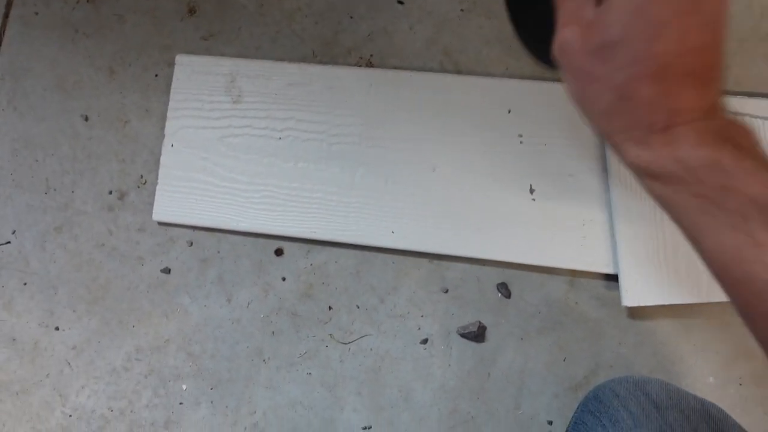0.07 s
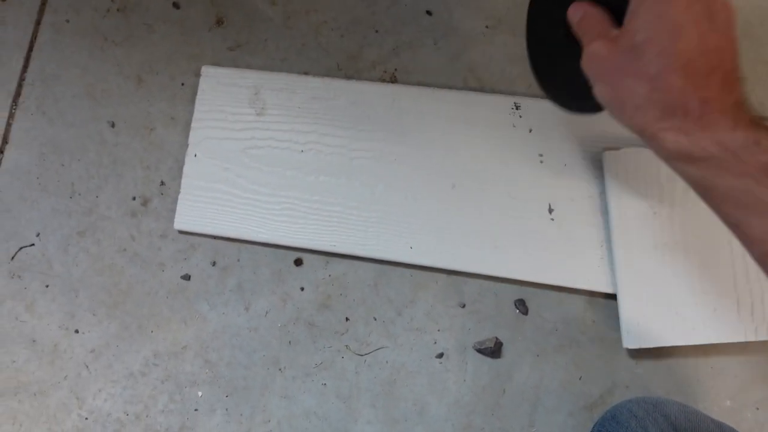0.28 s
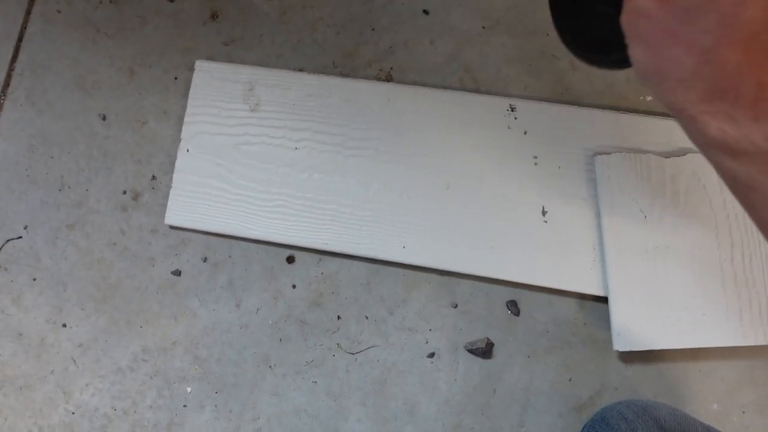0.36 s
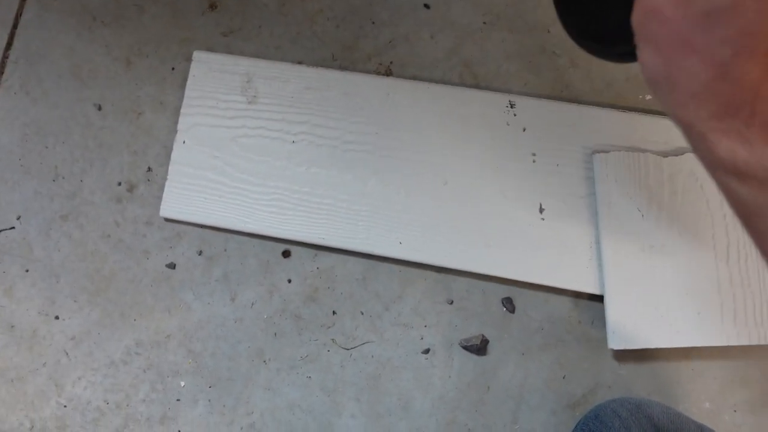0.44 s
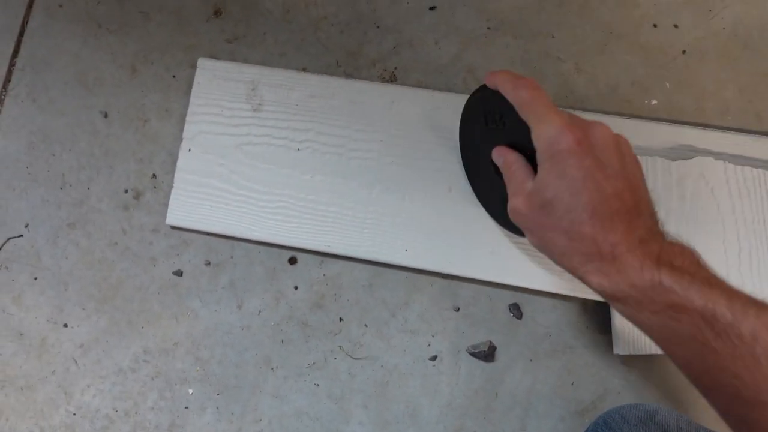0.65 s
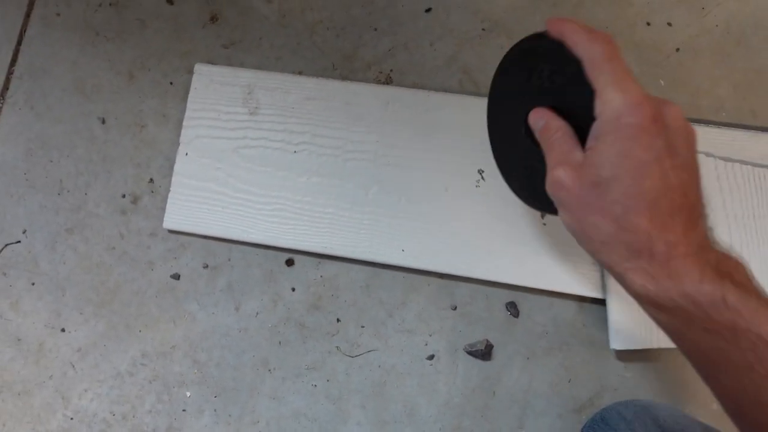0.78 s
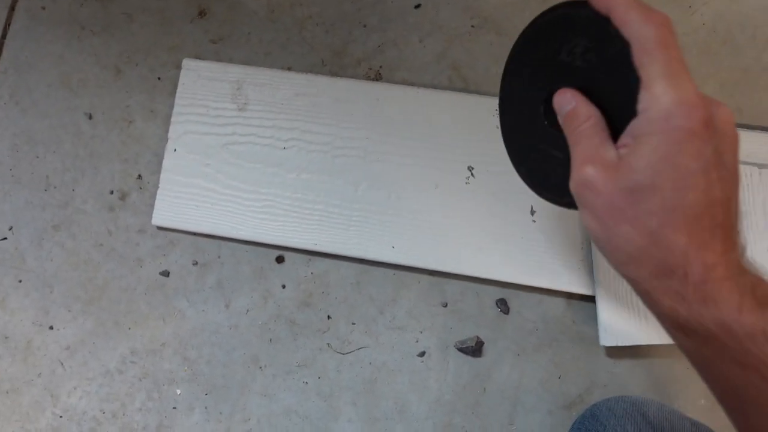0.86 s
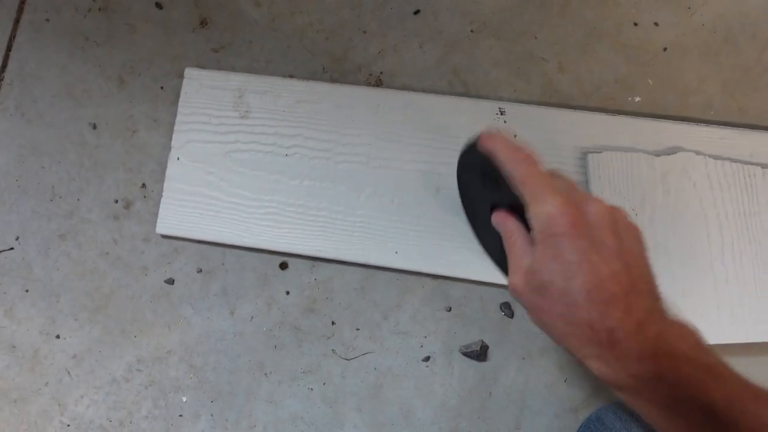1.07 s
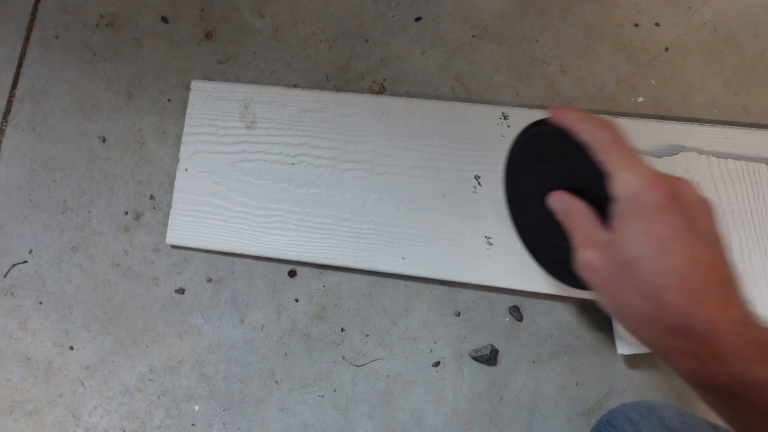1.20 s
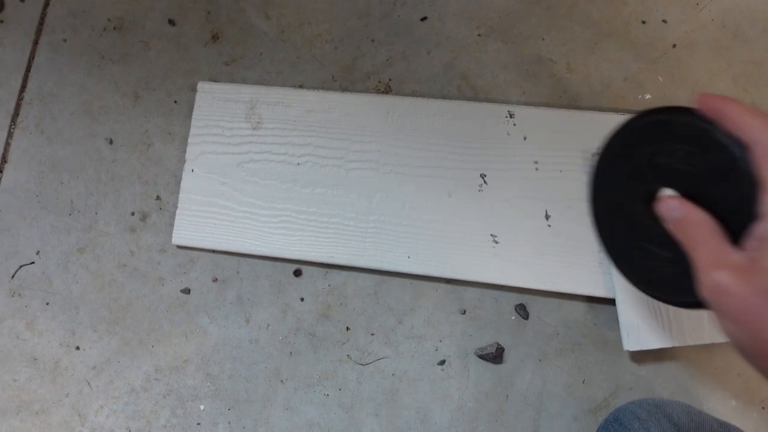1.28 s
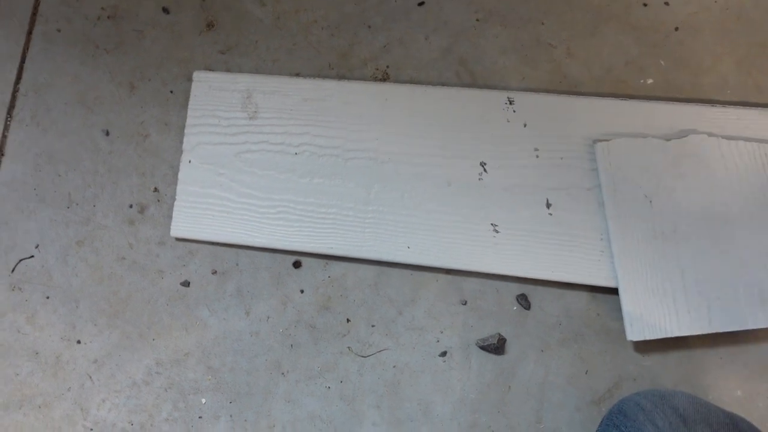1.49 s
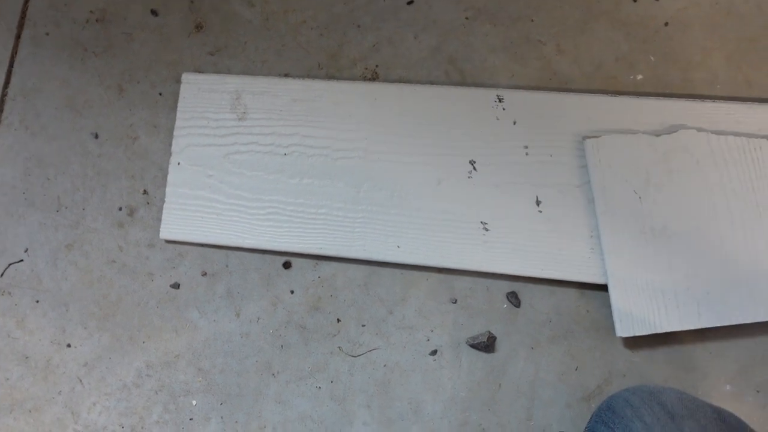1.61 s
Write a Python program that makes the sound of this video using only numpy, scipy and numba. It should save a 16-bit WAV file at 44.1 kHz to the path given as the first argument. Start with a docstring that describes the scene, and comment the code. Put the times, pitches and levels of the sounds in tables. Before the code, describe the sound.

Hard knocks of a small iron plate on a loose cement board. A faint dull sound dies away over hiss, then blows land at about 0.2, 0.7 and 1.17 seconds. Each cracks and thuds with a short, woody-stony ring, then the board chatters and slaps on concrete for 0.2 to 0.35 seconds. Bare garage walls ring briefly. The close microphone overloads; the left is much louder.

```python
"""Over hiss and a very low wobble, a dull sound dies away; then a small iron weight plate knocks three times
on a cement board lying loose on a garage floor. Each blow rings the board's damped modes, cracks and thuds;
the board then chatters and slaps on the concrete, and bare walls ring on as decaying banded noise.
The close microphone overloads on the blows and its gain control ducks late, so the left channel clips."""
import sys
import numpy as np
from scipy import signal
from scipy.fft import rfft, irfft
from scipy.io import wavfile
from numba import njit

SR = 44100
rng = np.random.default_rng(int(sys.argv[2]) if len(sys.argv) > 2 else 0)


def inscribe(sig):
    """Save sig as 16-bit PCM at rate SR to the path in sys.argv[1].

    A 1-D sig is mono; a 2-D sig holds one channel per row.
    Samples are clipped to [-1, 1] before scaling.
    """
    pcm = np.round(np.clip(np.atleast_2d(sig).T, -1, 1) * 32767)
    wavfile.write(sys.argv[1], SR, pcm.astype(np.int16))


N = 72765

PREAMP_DB = 7.5
RIGHT_DB, UNLIKE_DB = -10.5, -36  # right against left; unshared echoes against the left signal


def undb(db):
    """Decibels to amplitude factor."""
    return 10 ** (np.asarray(db, float) / 20)


def unit(x):
    """Scale to rms 1."""
    return x / np.sqrt(np.mean(x ** 2))


def band(x, lo_hz, hi_hz):
    """Band-pass, its upper edge held below the Nyquist frequency."""
    sos = signal.butter(2, [lo_hz, min(hi_hz, .45 * SR)], "band", fs=SR, output="sos")
    return signal.sosfilt(sos, x)


def taps(times, sizes):
    """Impulses at the given times."""
    x = np.zeros(N)
    index = np.clip((np.asarray(times) * SR).astype(int), 0, N - 1)
    np.add.at(x, index, sizes)
    return x


def decay_per_sample(t60):
    """Factor per sample for a fall of 60 dB in t60 seconds."""
    return np.exp(-np.log(1000) / (t60 * SR))


def mode(x, hz, t60):
    """One damped resonance: a complex pole struck by each impulse."""
    pole = np.exp(2j * np.pi * hz / SR) * decay_per_sample(t60)
    return signal.lfilter([1], [1, -pole], x).imag


# Dull sound at the start, by band; level as it begins, at the preamp output
# columns: [f/Hz, level/dB, t60/s]
FADING = [(130, -63.5, 0.97), (256, -60, 1), (582, -51.5, 0.46), (1090, -55, 0.35), (1440, -62, 0.5),
          (2600, -61.5, .3)]


def dull_sound():
    """Bands of noise, each dying away exponentially from the first instant."""
    t = np.arange(N) / SR
    dying = np.zeros(N)
    for hz, db, t60 in FADING:
        noise = unit(band(rng.standard_normal(N), hz / 1.21, hz * 1.22))
        dying += undb(db - PREAMP_DB - 60 * t / t60) * noise
    return dying


# Spectrum shape of the microphone channel's own noise
# columns: [f/Hz, relative level/dB]
HISS = [(35, 20.5), (150, -12), (500, -18), (2000, -7), (6000, -10), (12000, -10), (16000, -14)]
HISS_DB = [[-63], [-69]]  # left, right


def hiss():
    """Own noise of each channel, shaped in the spectrum."""
    hz = np.arange(N // 2 + 1) * SR / N + 1
    corner_hz, corner_db = np.array(HISS).T
    shape = undb(np.interp(np.log(hz), np.log(corner_hz), corner_db))
    noise = irfft(rfft(rng.standard_normal((2, N))) * shape, N)
    return undb(HISS_DB) * unit(noise)


# Course of the very low wobble from the hand on the recorder
# columns: [t/s, level/dB before the channel gains]
RUMBLE = [(0.0, -56), (0.09, -41.5), (0.142, -52.5), (0.242, -38.5), (0.284, -44), (0.352, -28.5),
          (0.418, -49.5), (0.886, -41.5), (0.914, -54), (1.034, -38.5), (1.35, -65), (1.524, -33.5),
          (1.59, -41), (1.65, -56.5)]
RUMBLE_HZ = 14.5


def rumble():
    """A slow sine below hearing pitch, its level following the hand on the recorder."""
    t = np.arange(N) / SR
    wave = np.sqrt(2) * np.sin(2 * np.pi * RUMBLE_HZ * t)
    level_db = np.interp(t, *np.array(RUMBLE).T)
    return wave * undb(level_db) * undb([[3.6], [3.0 + RIGHT_DB]])


# The three knocks of plate on board; crack and thud are relative to the level
# columns: [t/s, level/dB, crack/dB, thud/dB]
BLOWS = [(0.2102, 27.5, -6, 5), (0.7004, 23.5, 2.5, 3.5), (1.1663, 23, 3.5, -1)]


def blows():
    """Plate on board, as rows (time, ring, crack, treble); the treble lies 2.5 dB under the crack."""
    return [(s, undb(db), undb(db + crack_db), undb(db + crack_db - 2.5)) for s, db, crack_db, _ in BLOWS]


# Low resonances of the thud
# column: [f/Hz]
THUD_HZ = (45, 80, 125, 220, 350, 520)
THUD_T60_S, THUD_DB = 0.041, -19  # decay at 80 Hz; gain of all thuds


def thud():
    """Each blow strikes low damped modes; the higher ones die sooner."""
    t, level_db, _, thud_db = np.array(BLOWS).T
    strikes = taps(t, undb(level_db + thud_db + THUD_DB))
    return sum(mode(strikes, hz, THUD_T60_S * np.sqrt(80 / hz)) for hz in THUD_HZ)


# Loose chatter on the floor, one list after each blow; crack is relative to the level
# columns: [t/s, level/dB, crack/dB]
CHATTER = [
    [(.21, -13, 3), (.25, -19.5, -33), (.3, -13.5, -6.5), (.35, -18.5, -0.5), (.4, -14, -25),
     (.45, -13.5, -14), (.5, -16, -17.5), (.525, -35.5, -18), (.56, -45, -13)],
    [(.70, -13, -1), (.74, -18, -14), (.78, -14, -3), (.82, -9, -30), (.86, -17, -2.5), (.9, -31, 2),
     (.95, -47.5, -18)],
    [(1.167, 0.5, -3), (1.2, -11, -12), (1.25, -13, -5.5), (1.3, -13, -8.5), (1.35, -12.5, -13.5),
     (1.385, -20.5, -6.5), (1.41, -31, -3.5), (1.45, -72, -19)],
]
CHATTER_PER_S, CHATTER_SPREAD_DB, CHATTER_CRACK_DB = 1100, 0.5, 1


def chatter():
    """Many small random contacts of the loose board, as rows (time, ring, crack, treble)."""
    t = np.sort(rng.random(int(CHATTER_PER_S * N / SR))) * N / SR
    ring = np.zeros(len(t))
    for course in CHATTER:
        times, level_db, _ = np.array(course).T
        ring += undb(np.interp(t, times, level_db, left=-200, right=-200))  # silent outside its list
    ring = ring * undb(CHATTER_SPREAD_DB * (rng.exponential(size=len(t)) - 3.5))
    times, _, crack_db = np.vstack(CHATTER).T
    crack = ring * undb(CHATTER_CRACK_DB + np.interp(t, times, crack_db))
    return np.array([t, ring, crack, crack * undb(-30)]).T


# Board slapping the concrete; treble is relative to the crack, ring stands alone; offsets follow in slaps()
# columns: [t/s, crack level/dB, treble/dB, ring level/dB]
SLAPS = [(0.2224, 14.5, -37, 9.5), (0.232, -4.5, -5, -18), (0.2532, 4.5, -14, 1), (0.2945, -11.5, -32, -1),
         (0.3124, -18, -39, -17), (0.3278, -13, -14, -16), (0.3666, 0.5, -22, -1.5), (0.3823, 6.5, -20, 3),
         (0.4321, -11, -42, -13), (0.4363, -27, -19, -8.5), (0.451, -14, -31, -1), (0.4555, -9, -37, -2.5),
         (0.714, 13, -8.5, 8.5), (0.7295, -12, -28, -10), (0.758, -2, -36, -5), (0.7794, -2.5, -36, -2),
         (0.8044, -9, -49.5, -28), (0.8111, -1, -40, 3), (0.8653, -22.5, -15, -8.5), (1.1914, 0, -16, -7),
         (1.2167, 0.5, -26, -5), (1.2255, 1, -32, 4), (1.2675, -12, -44, -13), (1.287, -6, -22, -4.5),
         (1.2967, -3, -49, 5), (1.3068, -5, -50, 3.5), (1.3194, -12, -31, 1)]


def slaps():
    """Single slaps of board on floor, as rows (time, ring, crack, treble)."""
    return [(s, undb(ring_db), undb(db + 12), undb(db + treble_db + 16)) for s, db, treble_db, ring_db in SLAPS]


RISE_S = 0.0015  # time constant of the onset, as a 60 dB approach


def fade(x, t60):
    """Each impulse becomes an envelope with a quick rise and an exponential fall."""
    falling = signal.lfilter([1], [1, -decay_per_sample(t60)], x)
    k = decay_per_sample(RISE_S)
    return signal.lfilter([1 - k], [1, -k], falling)


# Modes of the cement board
# columns: [f/Hz, relative level/dB, t60/s]
BOARD = [(610, -9, 0.027), (815.2, -1, 0.052), (899, -8, 0.024), (953.3, 2, 0.055), (1027.8, 2.5, 0.067),
         (1095.8, 0, 0.048), (1133.6, 1, 0.054), (1200, -3.5, 0.044), (1239.7, -5.5, 0.14),
         (1381.7, 0, 0.051), (1460, -5.5, 0.06), (1610, -1.5, 0.024), (1927, -5.5, 0.024),
         (2136, -7.5, 0.027), (2428, -8, 0.034), (2770, -8.5, 0.019), (2990, -7, .02), (3000, -12, 0.06),
         (3710, -17.5, 0.016), (4057, -17, 0.029)]
MODE_SCATTER_DB, MODE_SPLIT = 4.5, 0.027  # unevenness per contact; upper twin is this fraction higher
FLOOR_CUT_HZ = 760.7
CRACK_HZ, CRACK_T60_S = (1850, 5187), 0.029
TREBLE_HZ, TREBLE_T60_S = 5500, 0.032  # lower edge


def board():
    """Every contact rings paired modes unevenly and cracks as noise; the floor takes the bass; blows thud."""
    t, ring, crack, treble = np.vstack([blows(), slaps(), chatter()]).T
    pairs = [(hz * (1 + twin * MODE_SPLIT), db, t60) for hz, db, t60 in BOARD for twin in (0, 1)]
    luck = rng.standard_normal((len(t), len(pairs)))
    sign = np.sign(rng.standard_normal(luck.shape))
    sign[:len(BLOWS)] = -1  # the blows push every mode the same way
    sound = np.zeros(N)
    for k, (hz, db, t60) in enumerate(pairs):
        strikes = taps(t, sign[:, k] * ring * undb(MODE_SCATTER_DB * luck[:, k]))
        sound += undb(db - 17) * mode(strikes, hz, t60)

    crack_noise = fade(taps(t, crack), CRACK_T60_S) * rng.standard_normal(N)
    sound += undb(-11.5) * band(band(crack_noise, *CRACK_HZ), *CRACK_HZ)  # twice, for steeper edges
    treble_noise = unit(band(rng.standard_normal(N), TREBLE_HZ, SR))
    sound += undb(-22) * fade(taps(t, treble), TREBLE_T60_S) * treble_noise

    floor_cut = signal.butter(8, FLOOR_CUT_HZ, "high", fs=SR, output="sos")
    return signal.sosfilt(floor_cut, sound) + undb(-11.5) * sound + thud()


# Ringing of the bare garage walls, by band
# columns: [f/Hz, t60/s, level/dB]
GARAGE = [(150, 0.72, -35), (400, .5, -28), (746, 0.48, -28.5), (1160, 0.44, -32), (1960, 0.58, -20.5),
          (3110, 0.49, -23.5), (4830, 0.6, -21.5), (7400, .5, -18), (12500, 0.31, -27)]


def garage(x):
    """Dense echoes: decaying noise in each band, swelling in over the first 34 ms."""
    t = np.arange(SR) / SR
    tail = np.zeros(SR)
    for hz, t60, db in GARAGE:
        noise = band(rng.standard_normal(SR), hz / 1.33, hz * 1.367)
        tail += undb(db - 60 * t / t60) * noise / np.sqrt(t60 * SR / 14)  # evens out long and short tails
    return signal.fftconvolve(x, tail * np.clip(t / 0.034, 0, 1))[:N]


def scene():
    """Board, garage and dull sound: nearly one signal, much weaker on the right."""
    dry = board()
    left = dry + garage(dry) + dull_sound()
    unlike = undb(UNLIKE_DB) * unit(garage(dry)) * np.std(left)
    return np.array([left, undb(RIGHT_DB) * (left + unlike)])


@njit
def follow(x, up, down):
    """Envelope that rises and falls at its own rates."""
    e, out = 0., np.empty(len(x))
    for i in range(len(x)):
        e += (x[i] - e) * (up if x[i] > e else down)
        out[i] = e
    return out


def lowpass(x, hz):
    """Gentle first-order low-pass."""
    return signal.lfilter(*signal.butter(1, hz, fs=SR), x)


OVERLOAD_LEVEL, LOPSIDED = 2.0, 0.24  # left capsule's saturation level; asymmetry as a fraction
DROOP, MIC_LOW_HZ, MIC_SOFT_HZ = 0.34, 284, 8560  # share of bass removed, its corner; treble corner
CEILING_DB, RATIO, ATTACK_S, RELEASE_S = -17, 7.06, 0.0027, 0.04
OUTPUT_CLIP, OUTPUT_SOFT_HZ, TOP_HZ = .7, 11400, 16500


def record(dry):
    """The capsule overloads lopsidedly, gain control ducks a few ms late, the louder channel clips meanwhile."""
    top = OVERLOAD_LEVEL * undb([[0], [RIGHT_DB]])
    drive = dry * undb(PREAMP_DB) / top
    x = top * np.tanh(drive ** 3 / 3 + drive) * (1 + LOPSIDED * np.tanh(drive))
    x = x - DROOP * lowpass(x, MIC_LOW_HZ)
    x = lowpass(x, MIC_SOFT_HZ)

    # one gain for both channels, driven by their mean level
    level = follow(np.abs(x).mean(axis=0), 1 / (ATTACK_S * SR), 1 / (RELEASE_S * SR))
    x = x * np.minimum(1, undb(CEILING_DB) / (level + 1e-9)) ** (1 - 1 / RATIO)
    clipped = np.clip(x, -OUTPUT_CLIP, OUTPUT_CLIP)
    x = lowpass(clipped, OUTPUT_SOFT_HZ) + hiss() + rumble()
    return signal.sosfilt(signal.ellip(12, .2, 90, TOP_HZ, fs=SR, output="sos"), x)


dry = scene()
out = record(dry)
inscribe(out)
```